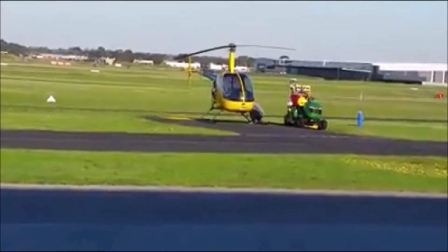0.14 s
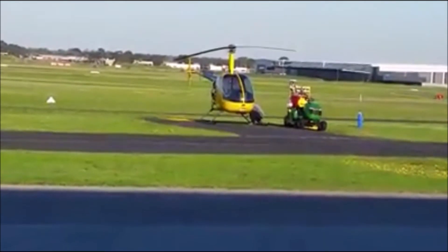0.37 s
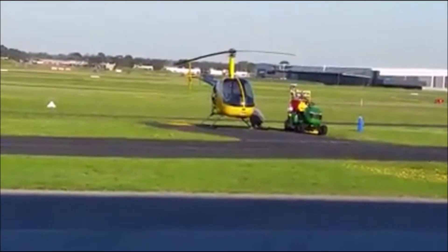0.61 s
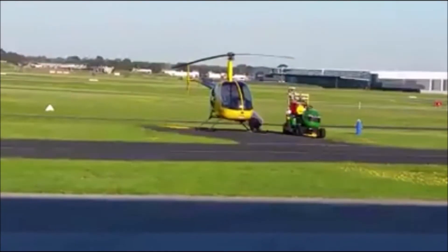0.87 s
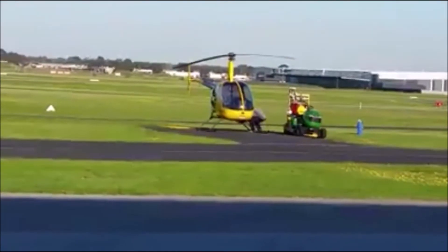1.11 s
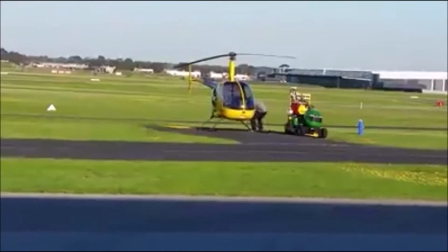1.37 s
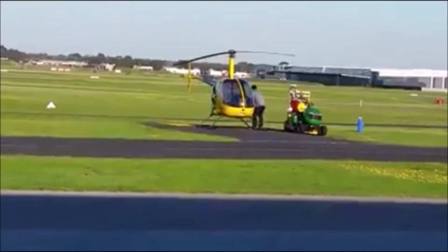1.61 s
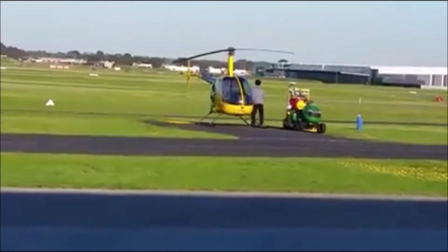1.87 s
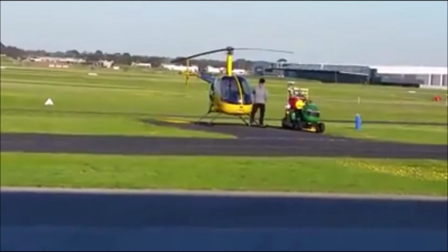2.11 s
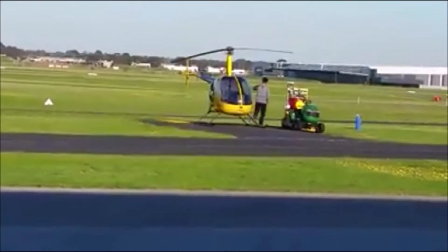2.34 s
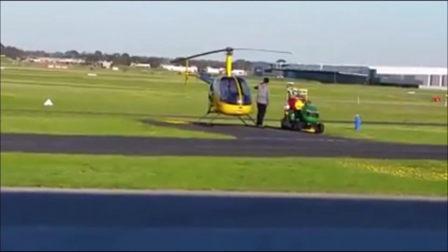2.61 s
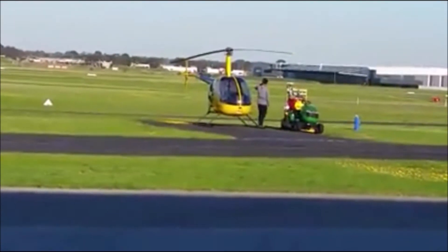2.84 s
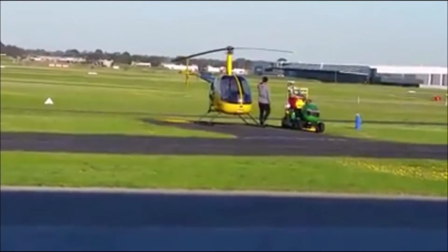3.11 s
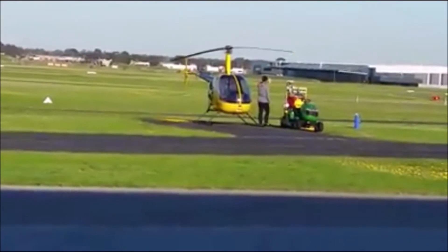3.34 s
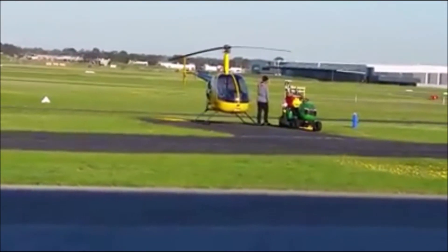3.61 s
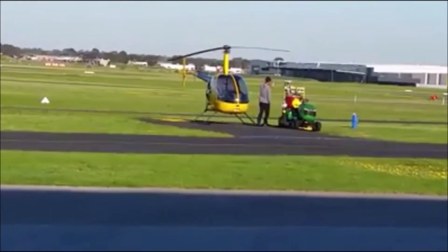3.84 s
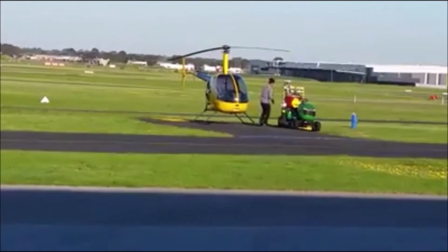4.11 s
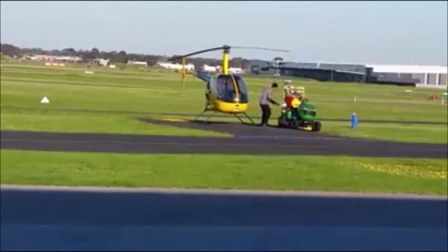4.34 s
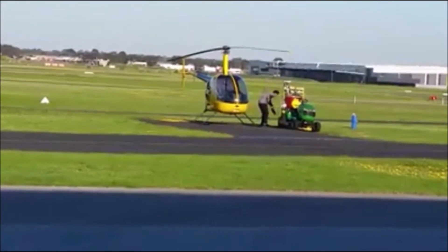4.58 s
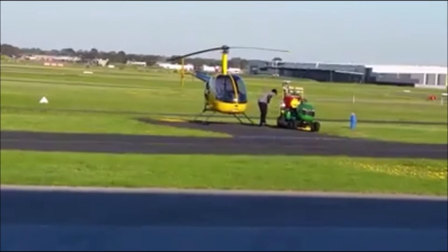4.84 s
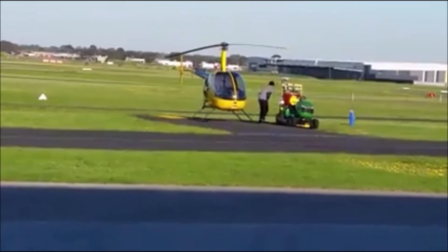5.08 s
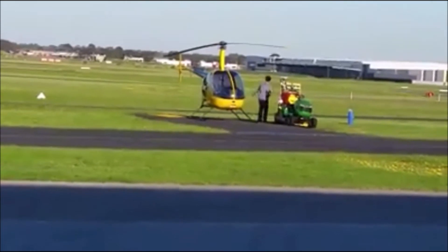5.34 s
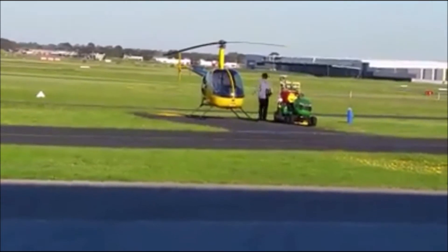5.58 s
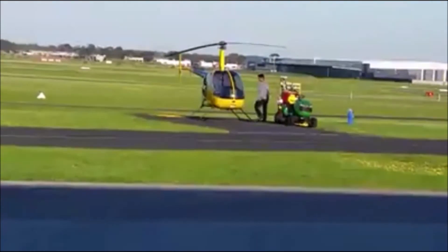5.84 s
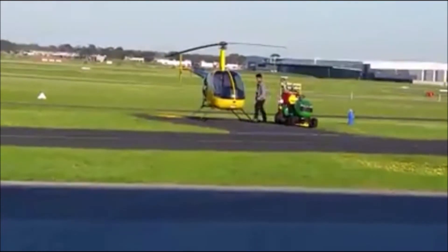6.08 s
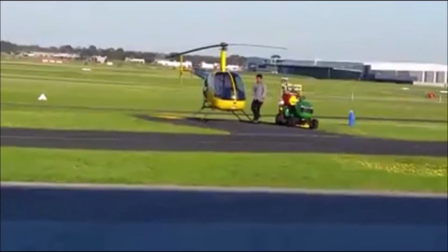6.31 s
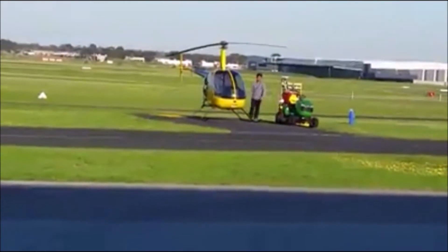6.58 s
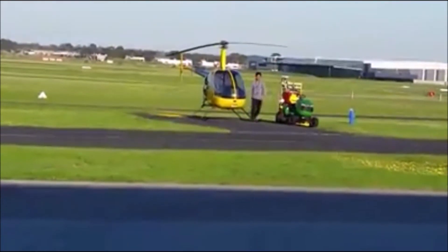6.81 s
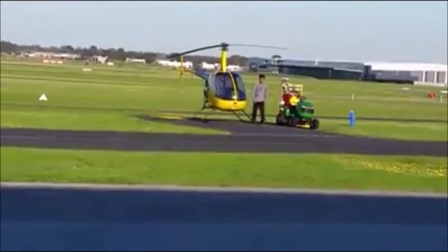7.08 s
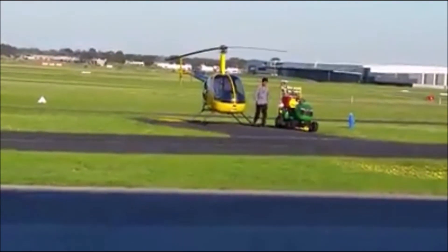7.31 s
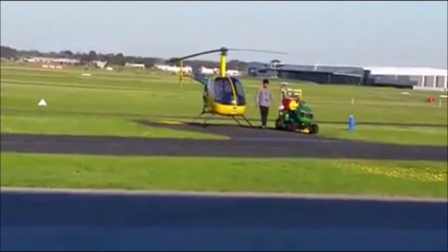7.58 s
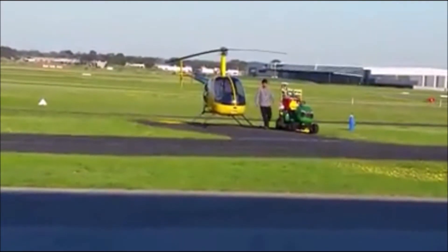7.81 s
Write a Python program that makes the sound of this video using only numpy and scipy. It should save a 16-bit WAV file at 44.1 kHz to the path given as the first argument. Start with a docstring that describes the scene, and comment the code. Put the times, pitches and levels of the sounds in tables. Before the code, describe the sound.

Outdoors on an open airfield, several piston engines and propellers hum together, low and dark, with a slow beating throb. In the first second or so one small engine revs up slightly, then drops in pitch and fades by about three and a half seconds. The steady hum grows fuller afterwards over a dull exhaust roar. One faint, dull knock comes late. A single microphone at a distance, the sound leaning strongly to the right.

```python
"""Several piston engines and propellers hum steadily on an open airfield, beating together: sines on shaft orders.
One small engine revs up and falls back in the first seconds: orders of a gliding crank speed.
A dull roar of exhaust and slipstream lies under all: coloured noise, partly pulsed at blade rates.
Faint airflow, hiss, a whine, short tone swells and one dull knock: shaped noise, sines, a damped resonance.
One microphone hears it; parametric stereo spreads the mono sound to two sides, strongly to the right."""
import sys
import numpy as np
from scipy import signal
from scipy.fft import rfft, irfft, next_fast_len
from scipy.io import wavfile

SR = 44100
rng = np.random.default_rng(int(sys.argv[2]) if len(sys.argv) > 2 else 0)


def voltage_ratio(decibels):
    """Convert decibels (scalar or array-like) to amplitude ratios, 20 dB per decade."""
    exponent = np.asarray(decibels, float) / 20
    return 10 ** exponent


def master(y):
    """Save y as 16-bit WAV."""
    cut = np.clip(np.atleast_2d(y).T, -1, 1)
    pcm = np.round(cut * 32767)  # scale
    wavfile.write(sys.argv[1], SR, pcm.astype(np.int16))


N = 350154

# noise spectra, relative: hz, level_db_per_hz
HISS_SPECTRUM = [(6400, -35), (6900, -22), (7750, -17.5), (8300, -31), (8550, -26.5), (8700, -18),
                 (9900, -18.5), (10900, -12), (12200, -14), (12400, -5), (13900, -0.4), (15600, -4.5),
                 (15720, -6)]
AIRFLOW_SPECTRUM = [(2200, -23.5), (2650, -2.5), (3500, -1.3), (4300, -8), (4920, -8.5), (6300, -18.5),
                    (6800, -25.5), (7500, -56)]
RUMBLE_SPECTRUM = [(18, -27.5), (35, -14.5), (60, -5.5), (100, -8.5), (160, -6.5), (250, -17), (340, -30.5),
                   (500, -47.5)]
SLIPSTREAM_SPECTRUM = [(500, -29.5), (850, -7), (964, -1), (1100, 0.5), (1350, -6.5), (1680, -4),
                       (2700, -29.5), (3510, -60.5), (5940, -120)]
EXHAUST_SPECTRUM = [(200, -29), (300, -3), (350, -7), (500, -6), (650, -6.5), (800, -6), (950, -14),
                    (1240, -41.5)]
# slow level of the roar: time_s, exhaust_db, slipstream_db, airflow_db
ROAR_LEVEL = [(0, -48.5, -54, -80), (1.0, -47, -51.5, -78.5), (2.6, -49.6, -53.3, -78.5),
              (4.8, -51, -54, -79.5), (6.4, -47.5, -56, -79.5), (7.94, -48.6, -53, -81)]
# dull knock far off: start_s, click_peak_db (before its filters)
KNOCKS = [(5.652, -32)]
# short swells of tone: centre_s, pitch_hz, top_rms_db, length_s (centre to 1/e)
TONE_SWELLS = [(1.009, 306, -52.5, 0.5), (2.301, 306, -59, 0.55), (5.663, 318, -56.5, 0.1),
               (7.047, 368, -61, 0.36)]
# small engine speed: time_s, crank_hz
REV_SPEED = [(0, 32.4), (.5, 35.3), (1, 36.2), (1.35, 36.5), (1.8, 35.3), (2.45, 31.5), (2.9, 30),
             (3.4, 29.5)]
# small engine orders, relative: multiple, level_db
REV_ORDERS = [(2, 0.1), (3, -4), (4, -9), (5, -21)]
# small engine level: time_s, lowest_tone_db, upper_tones_db
REV_LEVEL = [(0, -36.5, -37.5), (.8, -37, -31.5), (1.35, -29.5, -33.5), (2.0, -36, -35), (2.5, -37.5, -42),
             (3.1, -43, -48.5), (3.6, -75.5, -74.5)]
# hum orders at full level, before waver: multiple, rms_db
IDLE_ORDERS = [(2, -62), (3, -51), (4, -50), (5, -48), (6, -43), (8, -55), (9, -55), (10, -40), (12, -55),
               (15, -61), (17, -62), (20, -65)]
PROP_LOWEST_ORDER = [(1, -36.5)]
PROP_UPPER_ORDERS = [(2, -41.5), (3, -49), (4, -67)]
ROTOR_ORDERS = [(2, -53.5), (3, -57.5), (5, -70)]
BEAT_ORDERS = [(1, -36.5), (2, -61.5), (3, -68.5)]
FAR_ORDERS = [(1, -48.5), (2, -59.5)]
TWIN_ORDERS = [(4, -60), (5, -61.5)]
# stereo gains: hz, plain_left_gain, smeared_left_gain, smeared_taken_from_right_gain (plain right is 1)
SPREAD = [(59.6, 0.34, 0.023, 0.15), (125, 0.21, 0.064, 0.046), (280, .26, 0.12, 0.036),
          (560, 0.2, 0.12, .09), (940, 0.071, 0.066, 0.13), (1670, 0.026, 0.24, 0.063),
          (2050, 0.12, 0.18, 0.17), (2620, .25, 0.54, 0.25), (3530, 0.69, 0.67, 0.53),
          (6000, 0.52, 0.62, 1), (12000, 0.87, 1, 0.83)]
# allpass links of the spreader: lag_slots, turn_per_band, feedback_gain
ALLPASS_LINKS = [(3, .43, .651), (4, .75, .565), (5, .347, .49)]

IDLE_HZ, PROP_HZ, ROTOR_HZ = 14.875, 77.9, 88.52  # shaft or blade rates
BEAT_HZ, FAR_HZ, TWIN_HZ = 101.8, 91.9, 49.6
SLOT_S = 64 / 48000  # time unit of the spreader


def in_time(rows):
    """Columns of a table as curves over time."""
    s, *columns = np.transpose(rows)
    return [np.interp(np.arange(N) / SR, s, c) for c in columns]


def at_hz(rows, hz):
    """Columns of a table read on a log-frequency axis."""
    f, *columns = np.transpose(rows)
    return [np.interp(np.log(hz + 1), np.log(f), c) for c in columns]


def ramp(start_s, end_s, before):
    """Holds a value, slides evenly to zero between two moments and stays there."""
    return np.interp(np.arange(N) / SR, [start_s, end_s], [before, 0])


def drift(rate_hz):
    """Slow chance of spread 1: two-pole smoothed noise, drawn every 100 samples."""
    step = 100
    pole = np.exp(-2 * np.pi * rate_hz * step / SR)
    raw = rng.standard_normal(N // step + 3002)
    slow = signal.lfilter([1], [1, -2 * pole, pole * pole], raw)[3000:]  # settled part
    return np.interp(np.arange(N) / step, np.arange(len(slow)), slow / slow.std())


def noise(spectrum, patchy_db, rate_hz):
    """Coloured noise in overlapping third-octave bands, each swelling on its own; rms 1."""
    hz = np.arange(N // 2 + 1) * SR / N
    low_hz, high_hz = spectrum[0][0], spectrum[-1][0]
    inside = (hz > low_hz) & (hz < high_hz)
    colour = rfft(rng.standard_normal(N)) * voltage_ratio(at_hz(spectrum, hz)[0]) * inside
    place = 3 * np.log2((hz + 1) / low_hz)  # in third octaves
    total = np.zeros(N)
    for k in range(int(place[inside].max()) + 2):
        band = irfft(colour * np.clip(1 - abs(place - k), 0, 1), N)
        total += voltage_ratio(patchy_db * drift(rate_hz)) * band
    return total / total.std()


def narrow(hz, width_hz):
    """A breathy tone: a sine whose size and phase wander; rms near 1."""
    angle = 2 * np.pi * np.cumsum(hz * np.ones(N)) / SR
    return drift(width_hz) * np.cos(angle) + drift(width_hz) * np.sin(angle)


def turning(hz, wobble):
    """Shaft angle at a slightly unsteady speed; wobble is its relative spread."""
    return 2 * np.pi * np.cumsum(hz * (1 + wobble * drift(.8))) / SR


def hum(angle, orders, waver_db):
    """Sines on multiples of the shaft angle; moving air makes each one waver in level."""
    total = np.zeros(N)
    for multiple, rms_db in orders:
        gain = np.sqrt(2) * voltage_ratio(rms_db + waver_db * drift(1.9))
        total += gain * np.sin(round(multiple) * angle + rng.uniform(0, 2 * np.pi))
    return total


def puffs(angle, depth):
    """A gain of rms 1 pulsing with the blade angle and its double; great depth swings it through zero."""
    gain = 1 + depth * (np.cos(angle) + .6 * np.cos(2 * angle - 1))
    return gain / np.sqrt(np.mean(gain ** 2))


def hiss():
    """Faint steady treble noise."""
    return voltage_ratio(-82.5) * noise(HISS_SPECTRUM, .6, 3.)


def far_airflow(level_db):
    """Far moving air: faint noise above the roar in pitch."""
    return voltage_ratio(level_db) * noise(AIRFLOW_SPECTRUM, 0.88, 3.0)


def knock():
    """One short damped thud, softly struck: a lowpassed click rings a resonance."""
    clicks = np.zeros(N)
    for start_s, peak_db in KNOCKS:
        clicks[round(start_s * SR)] = voltage_ratio(peak_db)
    soft_strike = signal.butter(2, 1200., fs=SR, output="sos")
    soft = signal.sosfilt(soft_strike, clicks + 1e-18)
    decay_60db_s, ring_hz = 0.032, 500.0
    r, w = voltage_ratio(-60 / (decay_60db_s * SR)), 2 * np.pi * ring_hz / SR
    return signal.lfilter([0, np.sin(w)], [1, -2 * r * np.cos(w), r * r], soft)


def tone_swells():
    """Faint sines that rise and sink under a bell-shaped envelope."""
    t = np.arange(N) / SR
    total = np.zeros(N)
    for centre_s, pitch_hz, top_db, length_s in TONE_SWELLS:
        envelope = np.sqrt(2) * voltage_ratio(top_db) * np.exp(-((t - centre_s) / length_s) ** 2)
        total += envelope * np.sin(2 * np.pi * pitch_hz * t)
    return total


def whine(beat_angle):
    """A faint breathy tone pulsed by the beating engine."""
    return voltage_ratio(-66) * narrow(1117., width_hz=4.) * puffs(beat_angle, 0.83)


def rumble():
    """Low noise under the exhaust."""
    return voltage_ratio(-38.5) * noise(RUMBLE_SPECTRUM, 1.2, 3.)


def slipstream(level_db, beat_angle):
    """Noise of the air stream, pulsed at the beating engine's rate."""
    return voltage_ratio(level_db) * noise(SLIPSTREAM_SPECTRUM, 0.98, 5.6) * puffs(beat_angle, 0.16)


def exhaust(level_db, rotor_angle):
    """Exhaust noise and a breathy drone in it, both chopped by the rotor blades; the drone sags in pitch."""
    roar = voltage_ratio(level_db) * noise(EXHAUST_SPECTRUM, 1.2, 1.8) * puffs(rotor_angle, .2)
    drone_hz = 687.5 + ramp(3.0, 4.5, 9.0)
    drone = narrow(drone_hz, width_hz=7.) * puffs(rotor_angle, 1.6)
    return roar + voltage_ratio(level_db - 7.5) * drone


def revving():
    """The small engine speeds up, slows again and fades, upper orders first."""
    (crank_hz,), (low_db, upper_db) = in_time(REV_SPEED), in_time(REV_LEVEL)
    crank = turning(crank_hz, 0.0023)
    low = voltage_ratio(low_db) * hum(crank, REV_ORDERS[:1], 1.0)
    return low + voltage_ratio(upper_db) * hum(crank, REV_ORDERS[1:], 0.98)


def far_engine():
    """Far hum that swells once, then holds."""
    return voltage_ratio(ramp(1.5, 3.0, -12)) * hum(turning(FAR_HZ, .002), FAR_ORDERS, 5.7)


def beating_engine(beat_angle):
    """Engine orders that swell once, and a steady tone just below the first one that throbs against it."""
    engine = voltage_ratio(ramp(2.4, 3.7, -8)) * hum(beat_angle, BEAT_ORDERS, 2.4)
    return engine + hum(turning(100.0, .001), [(1, -43)], 1.2)


def propeller_and_twin():
    """Propeller orders and a twin hum; the lowest propeller tone and the twin take part of the swell."""
    swell_db = ramp(0.0, 3.2, -16)
    prop_angle = turning(PROP_HZ, 0.00059)
    prop = voltage_ratio(swell_db) * hum(prop_angle, PROP_UPPER_ORDERS, 0.93)
    prop += voltage_ratio(swell_db * 0.35) * hum(prop_angle, PROP_LOWEST_ORDER, 0.63)
    return prop + voltage_ratio(swell_db * .31) * hum(turning(TWIN_HZ, .002), TWIN_ORDERS, 3.5)


def rotor_hum(rotor_angle):
    """Steady rotor: sines on multiples of its rate."""
    return hum(rotor_angle, ROTOR_ORDERS, 2.2)


def idling_engine():
    """Steady engine: many orders of one slow shaft."""
    return hum(turning(IDLE_HZ, .0007), IDLE_ORDERS, 1.2)


def scene():
    """All sources reach one microphone."""
    rotor_angle, beat_angle = turning(ROTOR_HZ, .001), turning(BEAT_HZ, .002)
    exhaust_db, slipstream_db, airflow_db = in_time(ROAR_LEVEL)
    mix = hiss() + far_airflow(airflow_db) + knock() + tone_swells() + whine(beat_angle)
    mix += rumble() + slipstream(slipstream_db, beat_angle) + exhaust(exhaust_db, rotor_angle)
    mix += revving() + far_engine() + beating_engine(beat_angle)
    mix += propeller_and_twin() + rotor_hum(rotor_angle) + idling_engine()
    return np.tile(mix, (2, 1))


def smear(hz):
    """Response of the parametric stereo spreader: short allpasses by band, a plain delay in the treble."""
    band = hz * 2 * SLOT_S
    low_centre = (np.floor(2 * band) + .5) / 2  # half-width bands
    high_centre = np.floor(band) + .5
    centre = np.where(band < 1, band, np.where(band < 3, low_centre, high_centre))
    fade = np.clip(1 - .05 * (np.floor(band) - 3), 0, 1)  # less feedback upward
    out = np.exp(-1j * np.pi * (2 * band + .39 * centre))
    for slots, turn, gain in ALLPASS_LINKS:
        lag = np.exp(-1j * np.pi * (slots * band + turn * centre))
        out = out * (lag - gain * fade) / (1 - gain * fade * lag)
    delay_slots = np.where(band < 35, 14, 1)
    return np.where(band < 23, out, np.exp(-1j * np.pi * band * delay_slots))


def roll_off(x):
    """The treble ends steeply here."""
    return signal.sosfilt(signal.butter(12, 15900, fs=SR, output="sos"), x)


def record(dry):
    """A smeared copy is added on the left and taken from the right; the left level wanders."""
    size = next_fast_len(N + SR // 4)
    hz = np.arange(size // 2 + 1) * SR / size
    sound = rfft(dry[0], size)
    blur = sound * smear(hz)
    plain, added, taken = at_hz(SPREAD, hz)
    left = voltage_ratio(2.0 * drift(8.0)) * irfft(sound * plain, size)[:N]
    left += voltage_ratio(1.3 * drift(9.0)) * irfft(blur * added, size)[:N]
    right = irfft(sound - blur * taken, size)[:N]
    return roll_off(np.array([left, right]))


dry = scene()
out = record(dry)
master(out)
```